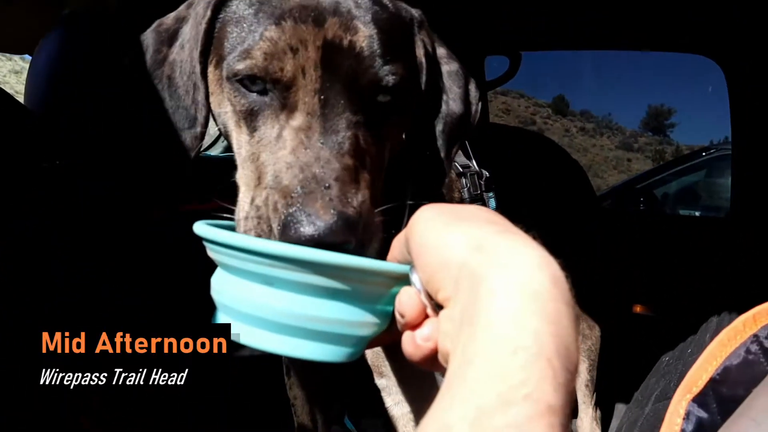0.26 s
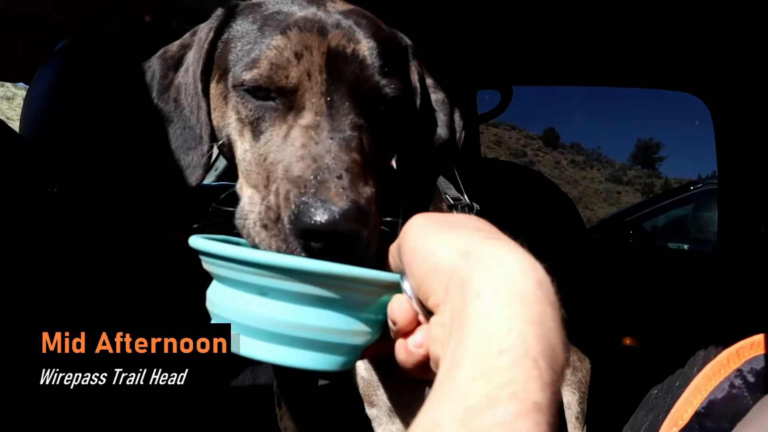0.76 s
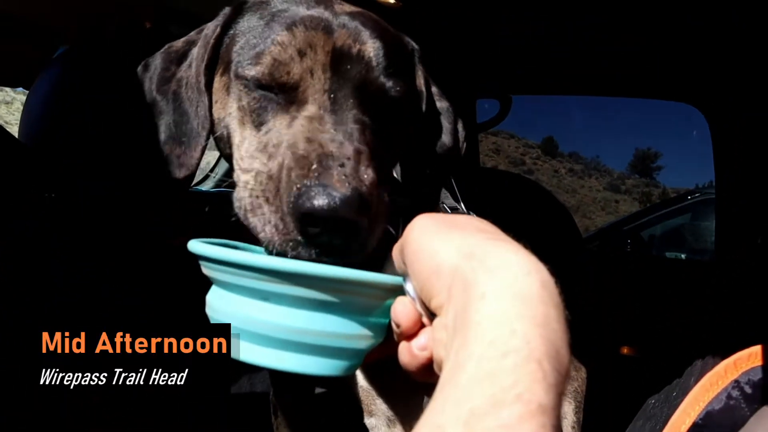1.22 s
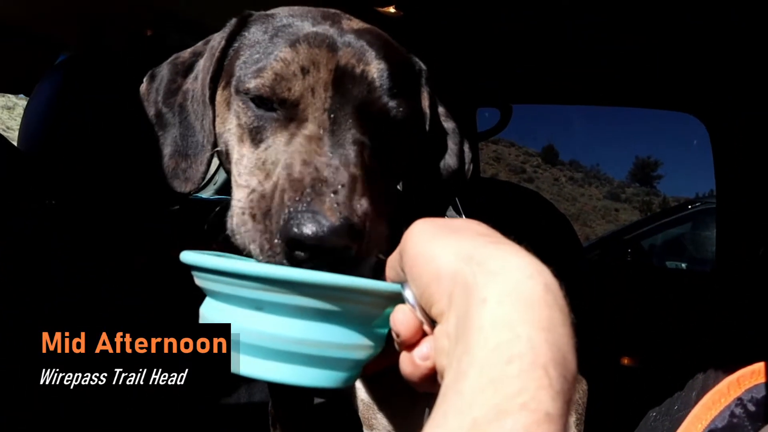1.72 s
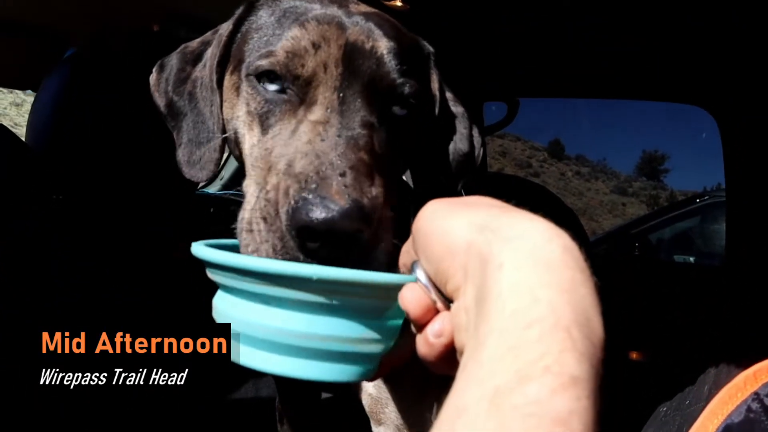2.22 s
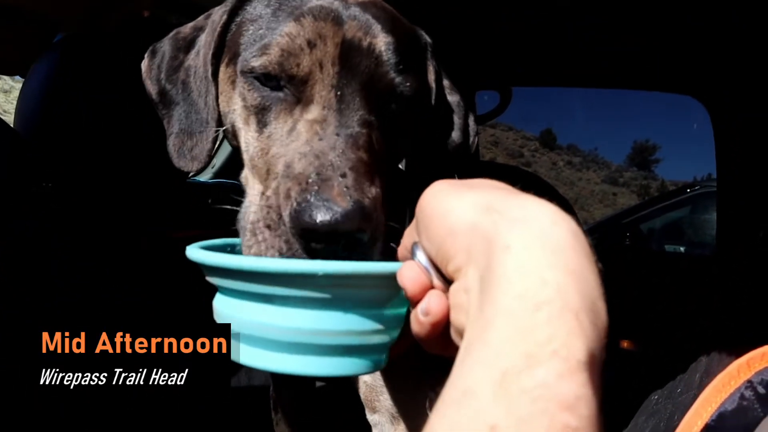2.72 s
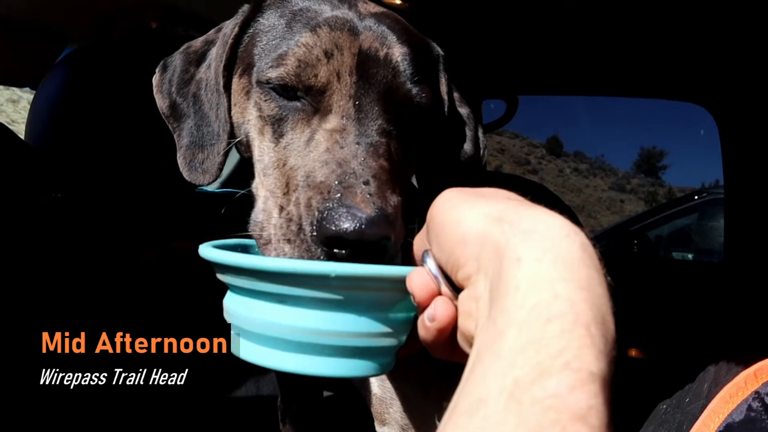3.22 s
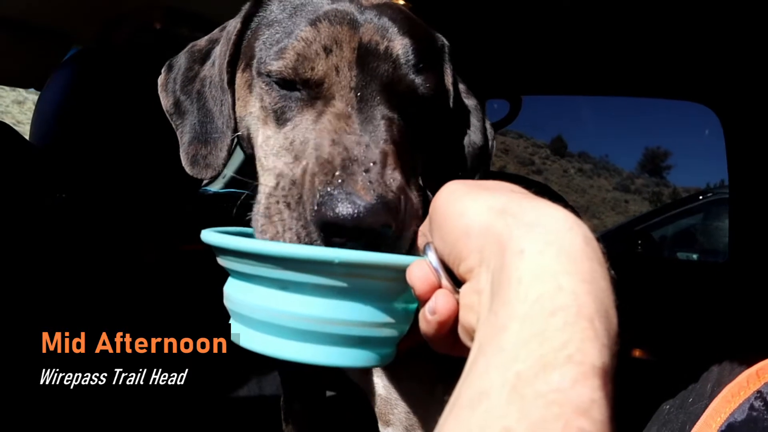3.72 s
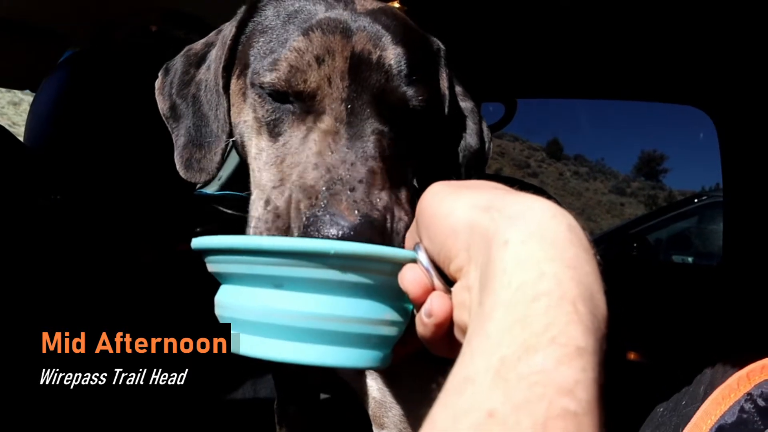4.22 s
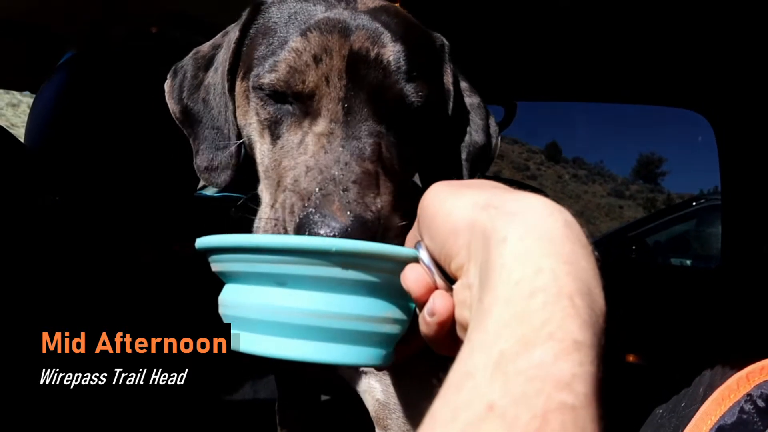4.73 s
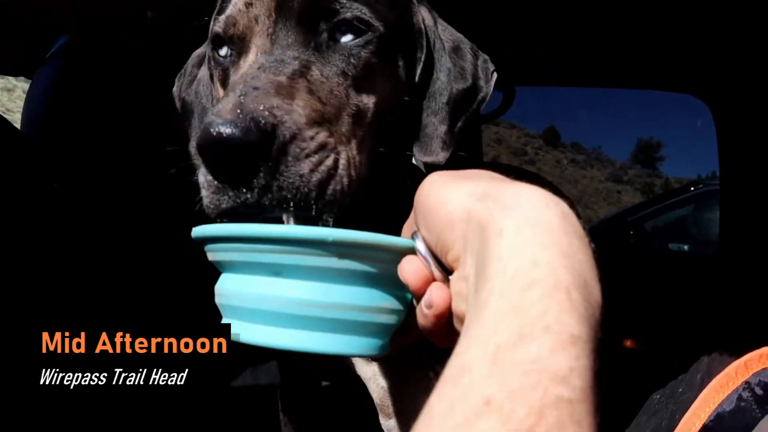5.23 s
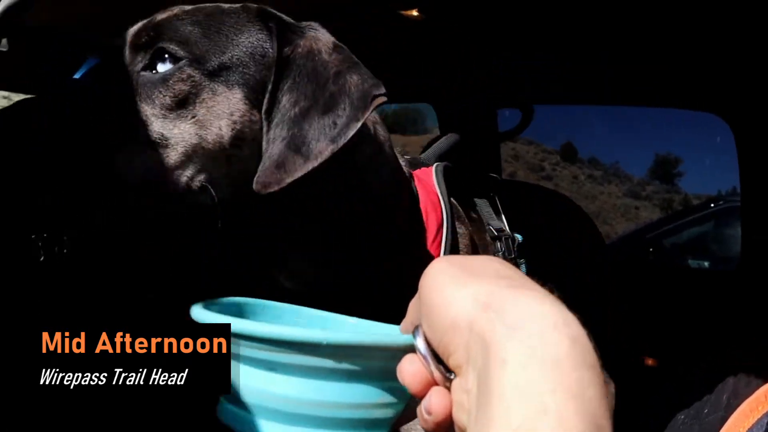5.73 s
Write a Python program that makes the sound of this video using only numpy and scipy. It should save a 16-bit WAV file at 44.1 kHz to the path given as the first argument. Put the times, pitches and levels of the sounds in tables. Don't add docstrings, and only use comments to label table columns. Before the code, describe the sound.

A dog laps water in quick wet strokes from a soft bowl, very close, with gulps, drips and low wind thumps on the microphone.

```python
import sys
import numpy as np
from scipy import signal
from scipy.fft import rfft, irfft, next_fast_len
from scipy.io import wavfile
from scipy.ndimage import uniform_filter1d

SR = 44100
rng = np.random.default_rng(int(sys.argv[2]) if len(sys.argv) > 2 else 0)


def gain_from_db(level_db):
    decades = np.asarray(level_db, float) / 20
    return 10 ** decades


def store_pcm(level_fs):
    pcm = np.round(np.clip(level_fs, -1, 1) * 32767).astype(np.int16)
    wavfile.write(sys.argv[1], SR, np.atleast_2d(pcm).T)


N = 262783

# (peak time [s], peak level [dB], pitch [Hz])
POPS = [(.041, -21, 1730), (.2284, -14, 1880), (.301, -15.5, 1800), (.4624, -16.5, 1830), (.4706, -9, 1940),
        (.8495, -7, 1960), (1.1879, -22, 1630), (1.622, -15.5, 1830), (1.862, -6, 1750),
        (1.9992, -10.5, 1780), (2.5905, -17.5, 2040), (3.0857, -5.5, 1960), (3.0957, -10, 2040),
        (3.3224, -15, 1890), (3.3375, -13, 2250), (3.7375, -13.5, 2060), (4.0824, -10.5, 1850),
        (4.0944, -14.5, 1890), (4.1912, -20.5, 2050), (4.3214, -10.5, 1810), (4.3398, -12, 1960),
        (4.5973, -21, 2250)]
# (peak time [s], peak level [dB], pitch [Hz])
SNAPS = [(.147, -22, 6130), (.2259, -14, 5540), (.305, -22, 5320), (1.079, -17.5, 3160),
         (1.2238, -15, 2820), (1.3705, -12.5, 4620), (1.6318, -19, 3740), (1.781, -18, 3740),
         (1.8543, -5.5, 5480), (1.988, -23, 6250), (2.0445, -17.5, 3970), (2.113, -15, 3190),
         (2.1224, -20, 3100), (2.2125, -8.5, 5100), (2.4724, -13.5, 2900), (2.519, -20, 2820),
         (2.5912, -14.5, 5440), (2.688, -25, 4880), (2.9647, -29, 3600), (3.7369, -14.5, 5750),
         (3.8612, -10.5, 4380), (3.932, -24.5, 6500), (4.2343, -19.5, 4420), (4.598, -17.5, 3110),
         (4.762, -20.5, 5250), (4.952, -11, 4000), (4.9922, -7.5, 3840), (5.0912, -17.5, 5180),
         (5.197, -19.5, 5070), (5.5406, -9.5, 3360)]
# (peak time [s], peak level [dB], pitch [Hz])
FROTH = [(0.3, -28, 3120), (0.3055, -29, 6650), (0.4576, -24, 3800), (0.58, -33, 3230), (0.611, -26, 3680),
         (0.84, -21.5, 3250), (0.8657, -22, 3060), (1.004, -20, 5300), (1.019, -24.5, 3500),
         (1.0308, -22.5, 5670), (1.171, -23.5, 3500), (1.1797, -25, 2850), (1.265, -26, 3640),
         (1.371, -26, 3080), (1.63, -27, 5400), (1.6417, -27.5, 5540), (1.848, -17, 5400),
         (1.8492, -28, 2670), (1.861, -17, 4670), (1.883, -24.5, 2630), (1.9906, -24, 3640),
         (2.223, -22, 5550), (2.227, -25, 5760), (2.2426, -30, 4760), (2.364, -24.5, 5740),
         (2.515, -25, 7120), (2.5924, -30, 2880), (2.609, -23, 4900), (2.8771, -29, 5400),
         (3.0193, -29.5, 2610), (3.0857, -14, 5260), (3.097, -20.5, 3590), (3.1006, -19, 4960),
         (3.244, -23.5, 3100), (3.335, -28, 3700), (3.385, -25, 3800), (3.6008, -27.5, 6000),
         (3.7383, -20, 6970), (3.8988, -27.5, 2880), (3.931, -23.5, 5270), (4.0954, -25, 3870),
         (4.2263, -32, 2630), (4.341, -20, 3180), (4.3843, -30.5, 5630), (4.731, -25.5, 2730),
         (4.951, -23, 5800), (4.9633, -20, 3650), (5.004, -22, 5340), (5.0925, -25.5, 6970),
         (5.1976, -28, 6800)]
# (peak time [s], peak level [dB], pitch [Hz],
# length [ms])
DRIPS = [(.3364, -31.5, 520, 6.8), (.548, -29.5, 570, 28.4), (.962, -36, 1530, 30),
         (1.1867, -16.5, 3230, 1.8), (1.3248, -29, 1080, 9.5), (1.47, -36, 440, 10), (1.74, -32.5, 589, 42),
         (1.855, -38.5, 230, 50), (2.215, -38.5, 226, 18), (2.2123, -17.5, 1930, 1.9),
         (2.3493, -26.5, 1960, 2.5), (2.405, -33, 2670, 21), (2.4232, -29, 1060, 8.3),
         (4.5229, -16.5, 2100, 1.45), (3.942, -33.5, 456, 5), (4.46, -32, 1080, 7.7),
         (4.861, -22, 1500, 2.7), (4.863, -37, 550, 7.4), (2.765, -35.5, 955, 14), (5.72, -40, 596, 9.3),
         (5.0905, -22, 1620, 4.6), (5.27, -27.5, 1100, 1.1), (5.6991, -34, 2570, 5.6)]


def rms_one(x):
    return x / np.sqrt(np.mean(x ** 2) + 1e-20)


def in_time(rows):
    s, *columns = np.transpose(rows)
    return [np.interp(np.arange(N) / SR, s, c) for c in columns]


def at_hz(points, hz):
    point_hz, point_db = np.transpose(points)
    return np.interp(np.log(hz), np.log(point_hz), point_db)


def band(x, low_hz, high_hz, order=2):
    return signal.sosfilt(signal.butter(order, [low_hz, high_hz], "band", fs=SR, output="sos"), x)


def coloured(spectrum):
    size = next_fast_len(N)
    hz = np.arange(size // 2 + 1) * SR / size + 1
    gain = gain_from_db(at_hz(spectrum, hz))
    white = rng.standard_normal(size)
    return rms_one(irfft(rfft(white) * gain, size)[:N])


def evened(x, low_hz, high_hz, span_s):
    x = band(x, low_hz, high_hz)
    swell = np.sqrt(uniform_filter1d(x ** 2, int(span_s * SR)) + 1e-12)
    return rms_one(band(x / swell, low_hz, high_hz, order=1))


def drift(rate_hz):
    r = np.exp(-2 * np.pi * rate_hz / SR)
    return rms_one(signal.lfilter([1], [1, -2 * r, r * r], rng.standard_normal(N + SR))[SR:])


def add(out, s, piece):
    i = int(s * SR)
    out[i:i + len(piece)] += piece[:N - i]


def bubble(hz, t60_s, rise, attack_s):
    t = np.arange(int(t60_s * SR) + 8) / SR
    phase = 2 * np.pi * hz * (t + 0.5 * rise * t ** 2 / t60_s)
    wave = np.sin(phase) * (1 - np.exp(-t / attack_s)) * gain_from_db(-60 * t / t60_s)
    return wave / np.abs(wave).max()


def swells(rows, neighbour_db, climb=1, rise_share=0.55):
    out = np.zeros(N)
    luck = rng.random((len(rows), 3))
    for (s, db, hz, length_ms), (a, b, c) in zip(rows, luck):
        swell_s = max(length_ms, 0.6) / 2100
        rise_s = rise_share * swell_s
        t = np.arange(int(6 * swell_s * SR)) / SR
        age = np.where(t < rise_s, t / rise_s, 1 + (t - rise_s) / swell_s)
        envelope = (age * np.exp(1 - age)) ** 1.44
        glide = t + climb * (0.04 + 0.32 * a) * (t ** 2 / (4 * swell_s) - t / 2)
        neighbour_hz = hz * (0.799 + 0.408 * b)
        neighbour = gain_from_db(neighbour_db) * np.sin(2 * np.pi * (neighbour_hz * t + 0.022 * c))
        add(out, s - rise_s, gain_from_db(db - 0.5) * envelope * (np.sin(2 * np.pi * hz * glide) + neighbour))
    return out


def ringing(rows, cycles):
    return [(s, db, hz, 1000 * cycles / hz * gain_from_db(-0.5 * (db + 18.5))) for s, db, hz in rows]


def spatter(rows, t60_s, width, broad_db):
    out = np.zeros(N)
    t = np.arange(int(0.06 * SR)) / SR
    noises = rng.standard_normal((len(rows), 2, len(t)))
    for (s, db, hz, *_), noise in zip(rows, noises):
        core = rms_one(band(noise[0], hz / width, min(hz * width, 16400), order=1))
        skirt = rms_one(band(noise[1], hz / 3.2, min(hz * 1.04, 16000)))
        envelope = gain_from_db(db - 60 * t / t60_s) * np.minimum(t * hz / 1.25, 1)
        add(out, s - 0.001, envelope * (core + gain_from_db(broad_db) * skirt))
    return out


def grains(spectrum, per_s, cycles, spread_db, smooth_db, clumps, count=14):
    sizes = gain_from_db(spread_db * np.minimum(rng.exponential(1, N), 3)) * rng.choice([-1, 1], N)
    born = rng.random(N) < per_s * gain_from_db(5 * clumps) / SR
    dealt = rng.integers(0, count, N)
    shapes = rng.random((count, 2))
    out = 0
    for k, hz in enumerate(np.geomspace(spectrum[1][0], spectrum[-2][0], count)):
        t60_s = cycles * (0.5 + 0.5 * shapes[k, 0]) / hz
        shape = bubble(hz, t60_s, rise=0.88 * shapes[k, 1], attack_s=0.68 / hz)
        rings = signal.oaconvolve(sizes * born * (dealt == k), shape)[:N]
        out = out + rings * hz * gain_from_db(at_hz(spectrum, hz))
    return rms_one(rms_one(out) + gain_from_db(smooth_db + 4.5 * clumps) * coloured(spectrum))


def released(held_db, t60_s):
    fall_db = 60 / t60_s * np.arange(N) / SR
    return np.maximum.accumulate(held_db + fall_db, axis=1) - fall_db


def hush():
    # (frequency [Hz], density [dB per Hz])
    cabin_spectrum = [(60, -30), (120, -12), (300, -5), (630, -3), (1600, -7), (5300, -12.5), (8000, -17.5),
                      (15500, -21), (16500, -45)]
    return gain_from_db(-55) * coloured(cabin_spectrum)


def wind():
    # (time [s], buffet level [dB])
    wind_rows = [(0.0, -41.5), (0.23, -34), (1.1, -48), (1.99, -39.5), (2.04, -30), (2.3, -50), (2.45, -26),
                 (3.0, -31.5), (3.06, -14.5), (3.28, -27), (3.45, -21.5), (4.51, -48.5), (4.61, -29),
                 (4.95, -51.5), (5.16, -22.5), (5.52, -41), (5.76, -32), (5.96, -43)]
    buffet_db, = in_time(wind_rows)
    flutter_db = -53 + 1.55 * (buffet_db + 35)
    buffet = evened(rng.standard_normal(N), 16.6, 52.3, 0.075) * gain_from_db(2 * drift(6))
    flutter = evened(rng.standard_normal(N), 53, 172, 0.06) * gain_from_db(3.8 * drift(7.4))
    return gain_from_db(buffet_db - 4) * buffet + gain_from_db(flutter_db) * flutter


def slaps():
    # (peak time [s], peak level [dB], pitch [Hz], length [ms])
    slap_rows = [
        (2.495, -29.5, 57.6, 34),
        (2.652, -21, 48, 15.4),
        (3.092, -5, 57.4, 24),
        (3.225, -25, 42.2, 25),
        (3.418, -10, 69, 16.4),
        (3.495, -18.5, 55.7, 58),
        (3.645, -25, 54, 26),
        (5.172, -17, 38, 37),
    ]
    return swells(slap_rows, neighbour_db=-11, climb=0, rise_share=1.28)


def breath():
    # (time [s], level [dB])
    breath_rows = [
        (5.67, -49),
        (5.75, -50.5),
        (5.84, -45.5),
        (5.96, -46),
    ]
    # (centre [Hz], width [Hz], level [dB])
    nose = [(670, 230, 9.5), (1400, 220, 4), (2040, 240, 1), (3050, 400, -7), (4020, 250, 2),
            (4980, 260, 0), (6100, 400, -8)]
    # (time [s], level [dB], pitch [Hz], t60 [s])
    whistle = (5.285, -56, 2300, 0.4)
    level_db, = in_time([(5.58, -80)] + list(breath_rows))
    air = rng.standard_normal(N)
    out = 0
    for k, (hz, width_hz, db) in enumerate(nose):
        r = np.exp(-np.pi * width_hz / SR)
        poles = [1, -2 * r * np.cos(2 * np.pi * hz / SR), r * r]
        resonance = (1 - r * r) * signal.lfilter([1, 0, -1], poles, air)
        out = out + (-1) ** k * gain_from_db(db + 1.5 * drift(14)) * resonance
    out = gain_from_db(level_db + 1.5 * drift(20)) * rms_one(out)
    s, db, hz, t60_s = whistle
    add(out, s, gain_from_db(db) * bubble(hz, t60_s, rise=-0.37, attack_s=0.015)[:int(0.09 * SR)])
    return out


def gulps():
    # (time [s], peak level [dB], pitch [Hz])
    gulp_rows = [(0.176, -27.5, 225), (0.218, -28.5, 225), (0.999, -28.5, 234), (1.246, -30, 237),
                 (1.32, -24, 223), (1.366, -30, 219), (2.59, -24.5, 217), (3.03, -20.5, 230),
                 (3.1, -22.5, 164), (3.778, -33, 234), (3.83, -27, 223), (4.258, -25, 225),
                 (4.307, -27.5, 237), (4.633, -25.5, 223), (5.525, -24, 386)]
    out = np.zeros(N)
    for s, db, hz in gulp_rows:
        add(out, s, gain_from_db(db) * bubble(hz, 13 / hz, rise=-0.23, attack_s=0.0022))
        add(out, s, gain_from_db(db - 8.5) * bubble(2.13 * hz, 0.02, rise=0.022, attack_s=0.0086))
    return out


def ticks():
    # (peak time [s], peak level [dB], brightest frequency [Hz])
    tick_rows = [(0.0327, -29.5, 13400), (0.0769, -36.5, 9500), (0.1466, -31, 8660), (0.1517, -36, 13950),
                 (0.6763, -31, 12300), (0.849, -30.5, 11150), (0.9368, -31, 9780), (1.1356, -34, 14990),
                 (1.1784, -25, 8900), (1.243, -19, 11400), (1.259, -44, 7500), (1.2887, -35, 11540),
                 (1.3112, -27, 12060), (1.3736, -33, 11330), (1.6283, -33, 8350), (1.6987, -28.5, 13800),
                 (1.7263, -26.5, 14690), (1.8583, -29, 13390), (1.9947, -37, 11100), (2.0434, -25.5, 13400),
                 (2.1224, -27, 9430), (2.1522, -29.5, 13260), (2.4722, -27.5, 14210), (2.5027, -27, 10000),
                 (2.515, -27.5, 7540), (2.864, -29.5, 8950), (2.8764, -29.5, 8050), (2.9954, -30, 11760),
                 (3.0861, -31, 7580), (3.1006, -27.5, 12600), (3.3792, -26, 11700), (3.6709, -24, 11500),
                 (3.7079, -35, 9050), (3.7384, -18.5, 7500), (3.7624, -40, 14000), (3.7849, -35, 12500),
                 (4.0751, -36, 14900), (4.1912, -17.5, 13200), (4.2064, -30, 12700), (4.226, -32, 13390),
                 (4.3327, -28, 9730), (4.6012, -25, 8650), (4.6193, -31, 12580), (4.6585, -31.5, 11000),
                 (4.6941, -28.5, 7400), (4.7129, -36.5, 10980), (4.763, -36, 9860), (4.9546, -35, 7600),
                 (5.0924, -34, 9300), (5.5409, -21, 8560), (5.8159, -32, 11900)]
    return gain_from_db(-2) * spatter(tick_rows, 0.014, width=1.12, broad_db=-2)


def droplets():
    # (time [s], peak level [dB], pitch [Hz])
    droplet_rows = [(0.386, -21.5, 910), (0.413, -30.5, 5960), (0.728, -23, 1500), (1.456, -20.5, 5400),
                    (2.663, -21.5, 4700), (2.329, -25, 1700), (2.719, -24, 5300), (2.732, -26.5, 5200),
                    (2.773, -32, 4960), (3.136, -23, 1880), (3.198, -21, 630), (4.813, -35, 1510),
                    (5.061, -21, 1540), (5.232, -24.5, 1600), (5.311, -22, 3570), (5.387, -27, 555),
                    (5.424, -29.5, 2580), (5.605, -45, 3200)]
    out = gain_from_db(-11) * spatter(droplet_rows, 0.018, width=1.08, broad_db=-9.5)
    for s, db, hz in droplet_rows:
        add(out, s, gain_from_db(db - 6) * bubble(hz, 5.8 / hz, rise=0.068, attack_s=0.48 / hz))
    return out


def stirring():
    # (time [s], length [s], slosh level [dB], fizz above slosh [dB])
    scoops = [(0, 0.12, -34.5, -12), (.454, 0.11, -32.5, -10.5), (.767, 0.038, -33, -18),
              (.825, 0.1, -33.5, -9.5), (1.169, 0.094, -35, -5), (1.311, 0.061, -42.5, -10),
              (1.45, 0.3, -43, -10), (1.455, 0.013, -47, 7), (2.68, 0.012, -42.5, -4),
              (1.611, 0.046, -25.5, -13.5), (1.698, 0.11, -38, -6.5), (2.008, 0.091, -35, -14),
              (2.085, 0.061, -32, -7.5), (2.354, 0.2, -43.5, -7.5), (2.453, 0.072, -33.5, -9.5),
              (2.82, 0.023, -47.5, -17), (2.854, 0.13, -32, -21), (2.954, 0.074, -38, -4.5),
              (3.229, 0.051, -32.5, -13.5), (3.312, 0.085, -34, -4), (3.468, 0.188, -37.5, -10),
              (3.669, 0.081, -35.5, -6), (3.874, 0.08, -40, -18), (4.07, 0.21, -43, -14),
              (4.14, 0.11, -32, -11), (4.49, 0.047, -36, -10.5), (4.553, 0.073, -34.5, -1.5),
              (4.94, 0.047, -28.5, -13), (5.078, 0.052, -36, -13.5)]
    # (time [s], length [s], slosh level [dB], fizz above slosh [dB])
    bites = [(.134, 0.024, -30, -8.5), (.219, 0.03, -27.5, -13), (.297, 0.024, -38, -20),
             (.67, 0.023, -37.5, -6.5), (1.0, 0.034, -29.5, -10.5), (1.365, 0.046, -32, -4.5),
             (1.845, 0.01, -23, -21), (1.986, 0.011, -23, -10.5), (2.211, 0.04, -33, -7.5),
             (2.582, 0.061, -37, -10.5), (3.077, 0.023, -29, -19), (3.732, 0.012, -28, -1.5),
             (3.832, 0.014, -28, -10), (4.307, 0.034, -27, -10), (4.684, 0.04, -30.5, -11),
             (5.4995, 0.025, -41, -3), (5.523, 0.027, -26.5, -6.5), (5.558, 0.019, -35, -11)]
    # (time [s], length [s], slosh level [dB])
    runoff_rows = [
        (0.173, 0.046, -47.5),
        (0.552, 0.055, -38.5),
        (0.939, 0.049, -48),
        (1.056, 0.015, -43.5),
        (1.266, 0.045, -46.5),
        (3.392, 0.076, -50),
        (3.749, 0.043, -40),
        (4.353, 0.037, -50),
        (4.636, 0.046, -53),
        (5.175, 0.034, -48.5),
    ]
    # (slosh level [dB], fizz level [dB], spray level [dB])
    still_db = (-56.5, -78, -64)
    runoffs = [(*row, -2) for row in runoff_rows]
    held_db = np.full((3, N), -90.)
    for rows, spray_db in ((scoops, -8.5), (bites, -10), (runoffs, -0.5)):
        for s, length_s, db, fizz_db in rows:
            start, end = int(s * SR), int((s + length_s) * SR)
            entry_s = min(0.02, length_s / 4.7)
            entry = np.clip(1 - np.arange(end - start) / SR / entry_s, 0, 1)
            entry_db = -1.5 * entry * np.array([[1], [2.5], [2]])
            above_slosh_db = np.array([[0], [fizz_db], [spray_db + 0.65 * fizz_db]])
            held_db[:, start:end] = db + entry_db + above_slosh_db
    ripples_db = np.maximum(released(held_db - 13, t60_s=0.39), np.array(still_db)[:, None])
    return np.maximum(released(held_db, t60_s=0.04), ripples_db)


def churn():
    # (frequency [Hz], density [dB per Hz])
    slosh_spectrum = [(190, -54), (330, -9.5), (618, -2.5), (1270, -1.5), (1510, 1), (2700, -13),
                      (3900, -15), (6600, -120)]
    fizz_spectrum = [(1470, 10), (2500, 2.5), (4660, 0), (5550, -0.5), (8000, -24), (10400, -34),
                     (17600, -120)]
    spray_spectrum = [(6000, 13), (7500, -6.5), (11000, 6.5), (14500, -0.5), (16300, -8)]
    slosh_db, fizz_db, spray_db = stirring()
    clumps = drift(45)
    spray_clumps = 0.49 * clumps + 0.73 * drift(60)
    slosh = grains(slosh_spectrum, per_s=600, cycles=40, spread_db=4, smooth_db=-10.5,
                   clumps=clumps, count=30)
    fizz = grains(fizz_spectrum, per_s=1300, cycles=60, spread_db=5, smooth_db=-12,
                  clumps=clumps, count=28)
    spray = grains(spray_spectrum, per_s=600, cycles=27, spread_db=7.5, smooth_db=-1,
                   clumps=spray_clumps, count=10)
    return gain_from_db(slosh_db - 0.75) * slosh + gain_from_db(fizz_db + 3) * fizz + gain_from_db(spray_db - 1) * spray


def trickle_and_froth():
    # (peak time [s], peak level [dB], pitch [Hz])
    trickle = [(0.0791, -31, 1240), (0.1451, -19.5, 1410), (0.2293, -23, 755), (0.2496, -18, 1520),
               (0.4985, -31, 1050), (0.5188, -31, 1510), (0.6806, -33, 1840), (0.6966, -30, 2350),
               (0.7706, -31.5, 1030), (0.7793, -33, 1480), (0.8417, -29, 537), (0.8882, -22, 1500),
               (1.0122, -23, 1480), (1.1784, -32, 2880), (1.222, -23.5, 1910), (1.3722, -23.5, 1530),
               (1.3772, -24, 2050), (1.6218, -25, 1550), (1.8474, -17.5, 1090), (1.8844, -33, 2430),
               (1.9084, -30.5, 560), (1.9897, -25, 1500), (2.0013, -22, 1060), (2.039, -35, 724),
               (2.1217, -25, 1610), (2.2378, -30, 1490), (2.3822, -25, 1480), (2.5905, -29, 1130),
               (2.6333, -26.5, 1450), (2.9939, -29, 1340), (2.9961, -25.5, 2540), (3.0999, -18, 1410),
               (3.2327, -30, 1450), (3.2457, -26, 1870), (3.2551, -16.5, 1860), (3.3205, -35, 550),
               (3.3342, -29.5, 590), (3.3691, -20, 2440), (3.3807, -33, 1460), (3.3829, -23, 2070),
               (3.5918, -28.5, 565), (3.6027, -29.5, 1420), (3.8371, -26.5, 1910), (4.2035, -31, 570),
               (4.3109, -28, 1890), (4.3849, -24.5, 1760), (4.4365, -31.5, 1010), (4.5598, -22, 1960),
               (4.7093, -22, 2030), (4.7144, -23, 1450), (4.9937, -19.5, 2450), (5.1156, -24.5, 1660),
               (5.501, -27.5, 2300)]
    small = [(s, db + 2, hz, 1000 * 4.76 / hz) for s, db, hz in trickle]
    small += [(s, db + 1.5, hz, 1000 * 9 / hz) for s, db, hz in FROTH]
    return swells(small, neighbour_db=-8)


def drips():
    return swells(DRIPS, neighbour_db=-3, climb=0.45)


def wet_trail():
    rows = list(SNAPS) + list(POPS) + list(FROTH) + list(DRIPS)
    return gain_from_db(-8.5) * spatter(rows, 0.032, width=1.005, broad_db=-10.5)


def pockets():
    # (peak time [s], peak level [dB], pitch [Hz], length [ms])
    hollows = [(.25, -27, 1620, 6.1), (.4987, -17, 1540, 4.3), (.8495, -5, 1434, 3.35),
               (.8669, -16.5, 1430, 7.9), (.8871, -21, 1500, 4.4), (.9145, -12, 1510, 6.7),
               (.925, -26, 2050, 7.5), (1.003, -16, 1560, 1.3), (1.019, -16, 1660, 2.8),
               (1.183, -17.5, 1620, 6.1), (1.4076, -15.5, 1620, 1.1), (1.6606, -9.5, 1434, 5.7),
               (1.758, -19, 1540, 5.7), (1.7836, -18.5, 1570, 4.4), (1.8553, -2, 1640, 2.2),
               (2.1137, -23, 1650, 5.4), (2.8644, -20, 1460, 4.8), (2.8812, -19.5, 1410, 1.24),
               (3.0859, -8.5, 1380, 2.24), (3.2528, -17.5, 1210, 2.6), (3.2643, -16, 1500, 7.2),
               (3.3672, -22, 1510, 5.9), (3.7362, -13.5, 1325, 5.1), (4.2417, -18, 1430, 5.4),
               (4.5236, -17, 1540, 5.2), (4.599, -16.5, 1510, 4.2), (4.7146, -18.5, 1483, 9.9),
               (4.9618, -18, 1500, 2.9), (4.991, -19, 1490, 7.5), (5.578, -39, 1280, 3)]
    # (peak time [s], peak level [dB], pitch [Hz])
    glugs = [(.1376, -18.5, 1030), (.784, -28.5, 1060), (.849, -19, 1150), (1.2511, -23.5, 498),
             (1.37, -27.5, 500), (1.658, -12.5, 800), (1.837, -36, 628), (2.0383, -31.5, 730),
             (2.2135, -19, 980), (2.9898, -26, 590), (3.2719, -17, 1050), (3.519, -25.5, 890),
             (3.69, -25.5, 840), (4.166, -25, 1030), (4.2105, -27, 574), (4.3116, -27.5, 512),
             (4.6951, -21, 650), (4.953, -15, 965), (5.552, -22, 1670), (5.5528, -19.5, 494)]
    bursts = list(hollows)
    bursts += ringing(POPS, cycles=8.67)
    bursts += ringing(glugs, cycles=3.38)
    bursts += ringing(SNAPS, cycles=6.6)
    return swells(bursts, neighbour_db=-6)


def cabin(x):
    t60_s, echo_db = 0.039, -16.5
    t = np.arange(int(t60_s * SR)) / SR
    tail = band(rng.standard_normal(len(t)), 210, 8400) * gain_from_db(-60 * t / t60_s) * (t > 0.0025)
    tail = tail / np.sqrt(np.sum(tail ** 2))
    return x + gain_from_db(echo_db) * signal.fftconvolve(x, tail)[:N]


def scene():
    water = droplets() + ticks() + churn() + trickle_and_froth() + drips() + wet_trail() + pockets()
    dog = breath() + gulps() + water
    return (hush() + wind() + slaps() + cabin(dog))[None]


def roll_off(x):
    return signal.sosfilt(signal.butter(12, 16650, fs=SR, output="sos"), x)


def record(dry):
    limited = np.clip(1.293 * np.tanh(dry / 1.319), -1, 1)
    top_cut = signal.cheby2(10, 50, 16700, fs=SR, output="sos")
    return roll_off(signal.sosfilt(top_cut, limited))


dry = scene()
out = record(dry)
store_pcm(out)
```